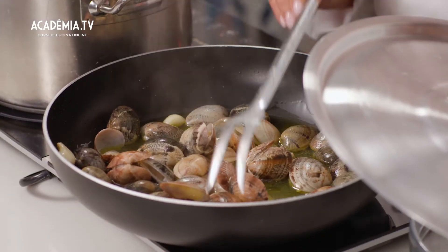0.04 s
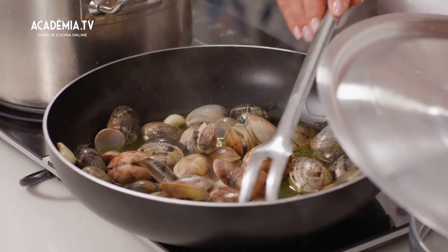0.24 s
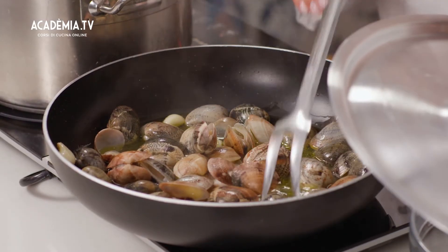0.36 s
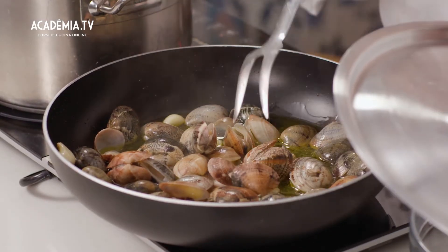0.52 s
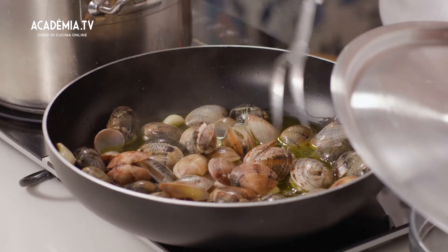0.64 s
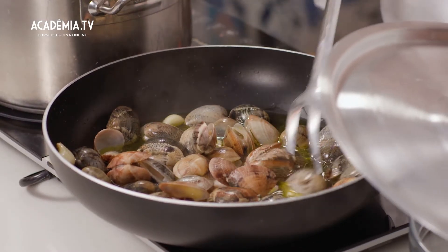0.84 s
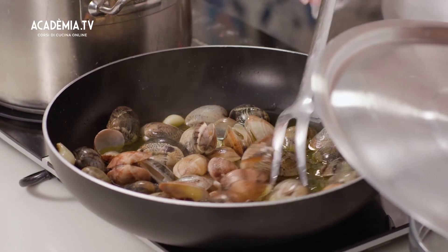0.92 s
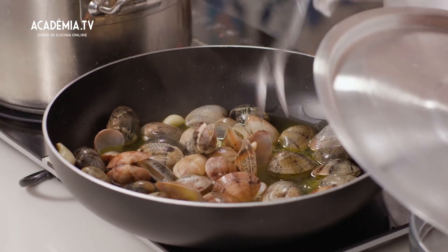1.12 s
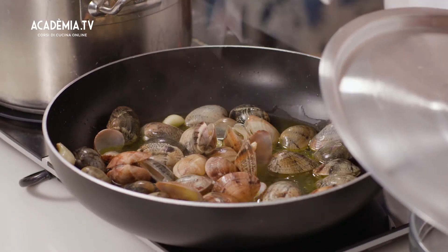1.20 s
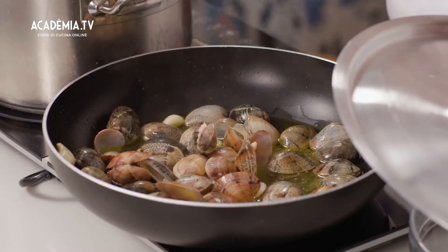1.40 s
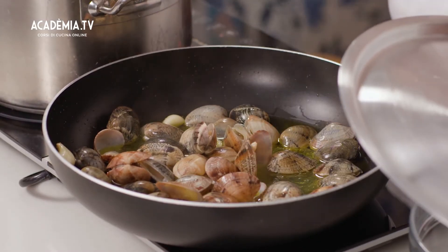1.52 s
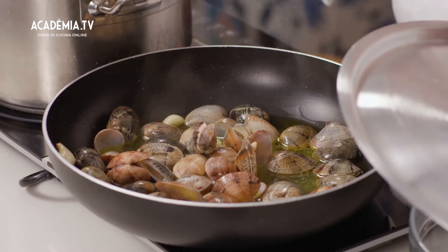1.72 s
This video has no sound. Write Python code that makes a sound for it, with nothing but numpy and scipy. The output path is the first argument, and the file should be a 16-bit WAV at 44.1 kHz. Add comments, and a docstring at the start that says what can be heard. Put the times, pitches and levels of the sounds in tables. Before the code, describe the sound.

A metal fork clatters and scrapes against clam shells in a frying pan, twice.

```python
"""Sharp clicks and a rasp: a metal fork pushes clams about in a frying pan.
Twice the tines knock on the shells and scrape over them, and the pushed clams tumble and settle.
The fork rings faintly as it slips off, and a last light knock sounds the pan.
Each touch makes what it hits ring briefly, with echoes from the pan and the kitchen.
Behind it all a fan hums and the oil barely sizzles."""
import sys
import numpy as np
from scipy import signal
from scipy.fft import rfft, irfft
from scipy.io import wavfile

SR = 44100
rng = np.random.default_rng(int(sys.argv[2]) if len(sys.argv) > 2 else 0)


def store_wav(level_fs):
    """Save 16-bit WAV to argv[1]."""
    pcm = np.round(np.clip(np.atleast_2d(level_fs), -1, 1) * 32767)
    wavfile.write(sys.argv[1], SR, pcm.T.astype(np.int16))


N = 77175
T = np.arange(N) / SR
FREQS_HZ = np.arange(N // 2 + 1) * SR / N

# Every knock of fork, shells and pan: start_s, level_db (before the boost), contact_s, body
KNOCKS = [(0.2375, -17.5, .0011, "tips"), (0.2488, -13, 0.00057, "tips"), (0.2638, -27.5, .0011, "tips"),
          (.2761, -23, .0009, "ribbed"), (0.2963, -18, .0012, "ribbed"), (.3068, -26.5, .0006, "glancing"),
          (0.3354, -19.5, .0009, "ribbed"), (0.3483, -19, .0004, "ribbed"), (.3564, -22, .0009, "ribbed"),
          (0.3685, -21.5, .0004, "ribbed"), (0.3778, -20, .0004, "ribbed"),
          (0.3916, -17.5, .0009, "ribbed"), (.3957, -28.5, 0.0013, "heap"),
          (0.4021, -22.5, .0013, "ribbed"), (0.4124, -25, .0008, "ribbed"), (0.4337, -25, .001, "ribbed"),
          (0.4416, -33, .0006, "heap"), (0.4547, -28.5, 0.001, "heap"), (0.4935, -39.5, .001, "heap"),
          (.8748, -33.5, 0.00046, "smooth"), (0.8767, -15, 0.00021, "smooth"),
          (0.8879, -29, .0015, "smooth"), (0.91, -26.5, .0005, "glancing"),
          (0.9223, -29.5, .0003, "glancing"), (0.9275, -22.5, .0003, "glancing"),
          (0.9292, -21, .0004, "glancing"), (0.934, -27, .0013, "glancing"), (0.9507, -12, .00047, "tines"),
          (.9540, -16, .0006, "tines"), (0.965, -26.5, .001, "glancing"), (.9950, -23.5, 0.003, "heap"),
          (1.0193, -33, .0018, "heap"), (1.0561, -34, .003, "ribbed"), (1.0705, -29, 0.0023, "heap"),
          (1.0939, -35.5, .001, "heap"), (1.1422, -41, .0005, "heap"), (1.2137, -50.5, 0.00093, "heap"),
          (1.7222, -27, .0011, "pan"), (1.728, -29, .004, "pan")]
def knocks(boost_db=19.5):
    """Each knock is a tiny rattle that sets a body (shell, fork or pan) ringing."""
    out = np.zeros(N + SR)
    for start_s, level_db, contact_s, body in KNOCKS:
        knock = energy_one(signal.fftconvolve(chatter(contact_s), ring(body)))
        start = int(start_s * SR)
        out[start:start + len(knock)] += from_db(level_db + boost_db) * knock
    return out[:N]

def chatter(contact_s):
    """The force of one knock: tiny bounces that swell and die away."""
    t = T[:SR // 30] / contact_s
    swell = t * np.exp(1 - t)
    bounces = rfft(rng.choice([-1, 1], len(t)) * swell)
    even = irfft(bounces / (np.abs(bounces) + 1e-12), len(t))  # all pitches equally strong
    return even * np.minimum(1, 2 * np.sqrt(swell))

# The tones each body rings with, lowest first: pitch_hz, relative_level_db
BODY_TONES = { "tips": [(4950, -1.5), (6350, 1.5), (8950, -1), (9900, 4.5), (11200, -1), (12500, 2),
              (13900, -2.5), (15200, -4.5)], "ribbed": [(3600, -10.5), (4900, -7), (5850, -0.5), (6350, -5),
              (7650, -6.5), (8250, 2), (8900, -9), (10100, 3.5), (10900, 4), (11500, 5), (12450, 1.5),
              (13500, -2.5)], "smooth": [(1100, -15), (4950, -3), (5650, -7), (6400, -11.5), (8500, -2),
              (9000, 3.5), (9550, 5), (10000, 8), (10900, -2), (11500, -5), (14500, -4.5)],
              "glancing": [(3250, -9.5), (3830, -3.5), (4950, 4), (5600, -8), (6900, -14), (8620, 3),
              (9100, 3.5), (9850, -4.5), (13200, -7)], "tines": [(1080, -17.5), (3000, -21), (3830, -1),
              (4700, 2), (7400, -7), (8200, 3.5), (8800, 1), (9550, 0.5), (10200, -5), (11500, 0.5),
              (12450, -1), (13150, 1), (14650, -1), (15300, -1.5)], "heap": [(1500, -14.5), (2680, 1.5),
              (3000, -2.5), (3380, 1), (3850, 1.5), (4550, 3.5), (5200, -2.5), (6300, -12), (8200, -3.5)],
              "pan": [(660, -10), (1500, -7), (1920, 0.5), (2400, -5.5), (2800, -8.5), (5740, -4.5),
              (6210, 3.5), (7150, 9), (7680, -1), (8700, 0.5), (10000, 0.5)]}
# How long each body's tones take to fade by 60 dB: body, fade_s
BODY_FADE_S = {"tips": .010, "ribbed": .012, "smooth": .007, "glancing": .008, "tines": .010, "heap": .009,
               "pan": .011}
def ring(body, spread_db=4.5, detune_share=0.013, crack_db=-12.5):
    """A tapped body gives a dry crack and fading tones, a little different at every spot."""
    t = T[:SR // 16]
    tones = 0
    for k, (pitch_hz, level_db) in enumerate(BODY_TONES[body]):
        louder, higher = rng.standard_normal(2)
        gain = (-1) ** k * from_db(level_db + spread_db * louder)
        tones += gain * np.cos(2 * np.pi * pitch_hz * (1 + detune_share * higher) * t)
    tones = energy_one(tones * fade(t, BODY_FADE_S[body]))
    crack = energy_one(filtered(signal.unit_impulse(len(t)), "band", [4970, 12000]))
    low_cut_hz = 0.59 * BODY_TONES[body][0][0]  # a body gives off little below its lowest tone
    return energy_one(filtered(tones + from_db(crack_db) * crack, "high", low_cut_hz, order=3))

# Tines dragged over a ribbed shell: time_s, level_db
RIB_SCRAPE = [(.25, -34), (.274, -29), (.287, -23.5), (.299, -32.5), (.313, -55), (.331, -45.5),
              (.359, -16.5), (.374, -32.5), (.402, -24), (.425, -57), (.47, -39), (.49, -62)]
# Tines skidding over a smooth shell before they slip off: time_s, level_db
SMOOTH_SKID = [(.88, -44), (.912, -42), (.931, -30), (.948, -48.5)]
def scrape(spots=4, catches_per_s=3400):
    """The tines catch and slip at several spots on a shell and keep it ringing."""
    out = 0
    for stroke, body in [(RIB_SCRAPE, "ribbed"), (SMOOTH_SKID, "glancing")]:
        for _ in range(spots):
            catches = clicks(catches_per_s / spots, spread_db=2.0) * level(stroke)
            out += through(catches, ring(body))
    return out / np.sqrt(spots)

# Shells sliding on each other, one list for each push: time_s, level_db
SHELL_SLIDES = [
    [(.275, -51), (.298, -29.5), (.32, -40.5), (.36, -31.5), (.405, -36.5), (.428, -39), (.47, -39.5),
     (.52, -53.5)],
    [(.878, -42), (.91, -52.5), (.96, -36), (.985, -44.5), (1.04, -38.5), (1.08, -42.5), (1.15, -54),
     (1.2, -65)],
]
# The tone colour of their grinding: pitch_hz, relative_level_db
GRIT_COLOUR = [(200, -37.5), (550, -14), (1000, -13), (1800, -6.5), (3000, 2.5), (7000, -1.5),
               (12500, -5.5), (16000, -9)]
def slides(ticks_per_s=6000, tilts_db_per_octave=(2, -1.46)):
    """Rough shells grind in a stream of tiny ticks, brighter when pressed than when settling."""
    out = 0
    for push, tilt in zip(SHELL_SLIDES, tilts_db_per_octave):
        spectrum = [(hz, db + tilt * np.log2(hz / 5000)) for hz, db in GRIT_COLOUR]
        out += level(push) * colour(clicks(ticks_per_s, spread_db=2.5), spectrum)
    return out

# The fork's own tones: pitch_hz, level_db
FORK_TONES = [(3822, -41), (4613, -47), (13200, -43.5)]
def fork_ring(start_s=0.92, fade_s=0.16):
    """Free of the shell, the tines ring on faintly."""
    age = np.maximum(T - start_s, 0)
    tones = sum(from_db(db) * np.sin(2 * np.pi * hz * age) for hz, db in FORK_TONES)
    return tones * fade(age, fade_s)

# A hollow note under the first push: time_s, pitch_hz, level_db
HOLLOW_NOTE = [(.25, 690, -65), (.295, 640, -53.5), (.33, 538.7, -60.5), (0.389, 442, -56), (.44, 405, -71)]
def hollow(width_hz=150):
    """A faint, breathy note sinks in pitch as the shells shift."""
    time_s, pitch_hz, level_db = np.transpose(HOLLOW_NOTE)
    waver = filtered(rng.standard_normal((2, N)), "low", width_hz / 2)
    phase = 2 * np.pi * np.cumsum(np.interp(T, time_s, pitch_hz)) / SR
    note = rms_one(waver[0] * np.cos(phase) + waver[1] * np.sin(phase))
    return level(np.column_stack([time_s, level_db])) * note

def bump(start_s=1.067, pitch_hz=93.4, swell_s=0.013):
    """A low, soft bump swells and fades as the shells settle."""
    age = np.maximum(T - start_s, 0)
    swell = age / swell_s * np.exp(-age / swell_s)
    return from_db(-56) * np.sin(2 * np.pi * pitch_hz * age) * swell

def pan_echoes(sound, level_db=-12.5, fade_s=0.059):
    """Sound bounces briefly between the pan's walls and the lid held beside it."""
    echoes = rng.standard_normal(N) * fade(T, fade_s) * (T > .001)
    return from_db(level_db) * through(sound, energy_one(echoes))

# The tone colour of the kitchen's echo: pitch_hz, relative_level_db
ROOM_COLOUR = [(200, -19), (1000, 9), (2500, -1.5), (4500, -3.5), (7000, -12), (11000, -3.5), (16000, -1)]
# How long that echo takes to fade by 60 dB: pitch_hz, fade_s
ROOM_FADE = [(500, 0.7), (3500, 0.33), (8000, 0.41), (15000, 0.13)]
def kitchen_echo(sound, level_db=-12, build_s=0.0066):
    """The room's echoes blur into a tail whose high pitches die sooner."""
    noise = rfft(colour(rng.standard_normal(N), ROOM_COLOUR))
    edges_hz = np.geomspace(200, 17000, 10)
    tail = 0
    for low, high in zip(edges_hz, edges_hz[1:]):
        band = irfft(noise * (FREQS_HZ >= low) * (FREQS_HZ < high), N)
        tail += band * fade(T, at_hz(ROOM_FADE, np.sqrt(low * high)))
    tail *= 1 - np.exp(-T / build_s)
    return from_db(level_db) * through(sound, energy_one(tail))

# The fan's hum and two faint whines: pitch_hz, level_db
FAN_TONES = [(332, -70.5), (398.4, -73.5), (662.1, -73), (1130, -67.5), (7950, -81.5), (12040, -85)]
# The tone colour of its rushing air: pitch_hz, relative_level_db
AIR_COLOUR = [(30, -49.5), (66, -20.5), (130, -12.5), (240, -7), (400, -5), (680, -3), (1120, -6.5),
              (1400, -13), (2300, -20.5), (5500, -29.5), (8500, -29)]
def fan(air_db=-60, width_share=0.0058):
    """A fan gives rushing air and a few wavering tones, each a narrow band of noise."""
    hum = 0
    for pitch_hz, level_db in FAN_TONES:
        distance = 2 * (FREQS_HZ - pitch_hz) / (width_share * pitch_hz)
        tone = irfft(rfft(rng.standard_normal(N)) / (1 + distance ** 2), N)
        hum += from_db(level_db) * rms_one(tone)
    return hum + from_db(air_db) * colour(rng.standard_normal(N), AIR_COLOUR)

# The frying, which picks up a little near the end: time_s, level_db
FRYING_LEVEL = [(0, -71.5), (1.36, -73), (1.52, -68), (1.75, -68)]
# The tone colour of the bubbles: pitch_hz, relative_level_db
SIZZLE_COLOUR = [(3000, -15.5), (7000, -16), (8200, 0), (12000, -1.5)]
def sizzle(bubbles_per_s=560):
    """Tiny bubbles burst in the warm oil."""
    return level(FRYING_LEVEL) * colour(clicks(bubbles_per_s, spread_db=-1.0), SIZZLE_COLOUR)

def from_db(db):
    """Turn decibels into a number to multiply by."""
    return 10 ** (np.asarray(db) / 20)

def rms_one(x):
    """Scale a sound so its average strength (rms) is 1."""
    return x / np.sqrt(np.mean(x ** 2) + 1e-20)

def energy_one(x):
    """Scale a sound so its total energy is 1."""
    return x / np.sqrt(np.sum(x ** 2) + 1e-20)

def fade(age_s, fade_s):
    """A smooth fall of 60 dB every fade_s seconds."""
    return np.exp(-np.log(1000) * age_s / fade_s)

def at_hz(points, hz):
    """Read between a table's rows, with octaves evenly spaced."""
    pitch_hz, value = np.transpose(points)
    return np.interp(np.log(np.maximum(hz, 1)), np.log(pitch_hz), value)

def level(points):
    """A volume curve through (time_s, level_db) points, silent outside them."""
    time_s, level_db = np.transpose(points)
    return from_db(np.interp(T, time_s, level_db)) * (T >= time_s[0]) * (T <= time_s[-1])

def colour(x, spectrum):
    """Give a steady sound a tone colour, at average strength 1."""
    return rms_one(irfft(rfft(x) * from_db(at_hz(spectrum, FREQS_HZ)), N))

def filtered(x, keep, edge_hz, order=2):
    """Keep the low pitches, the high ones or a band between."""
    return signal.sosfilt(signal.butter(order, edge_hz, keep, fs=SR, output="sos"), x)

def through(x, response):
    """Let every sample of a sound set off a ring or an echo."""
    return signal.fftconvolve(x, response)[:N]

def clicks(per_s, spread_db):
    """Random clicks of uneven size, at average strength 1."""
    sizes = from_db(spread_db * np.minimum(rng.exponential(1, N), 3.5))
    return rms_one((rng.random(N) < per_s / SR) * sizes * rng.choice([-1, 1], N))

def scene():
    """The clatter echoes in pan and kitchen, over the fan, the oil and a soft bump."""
    background = fan() + sizzle() + bump()
    clatter = scrape() + slides() + knocks() + fork_ring() + hollow()
    clatter += pan_echoes(clatter)
    return (clatter + kitchen_echo(clatter) + background)[None]

def record(dry):
    """The very highest pitches, above 15900 Hz, are cut away steeply."""
    return signal.sosfilt(signal.ellip(10, .2, 70, 15900, fs=SR, output="sos"), dry)

dry = scene()
out = record(dry)
store_wav(out)
```